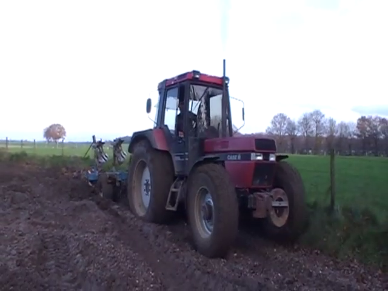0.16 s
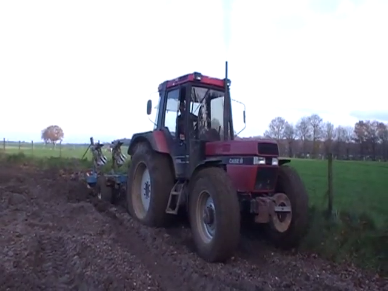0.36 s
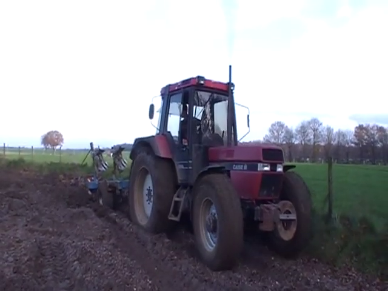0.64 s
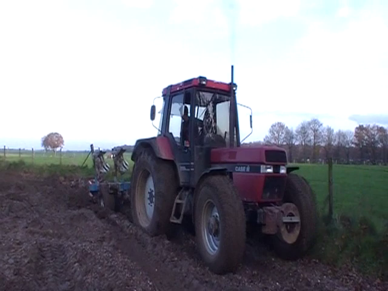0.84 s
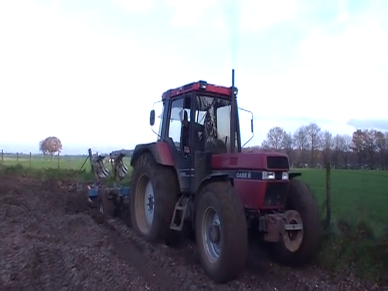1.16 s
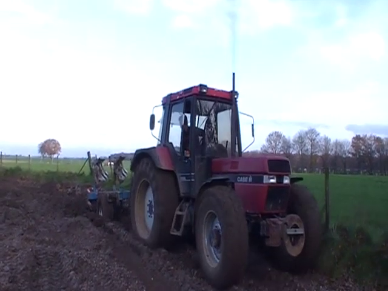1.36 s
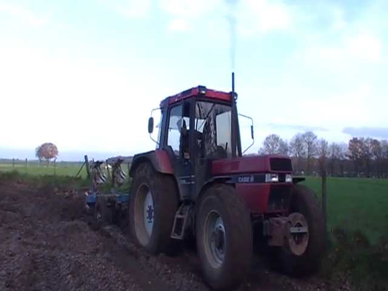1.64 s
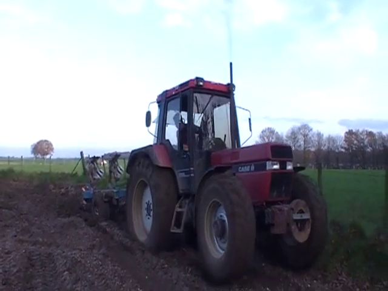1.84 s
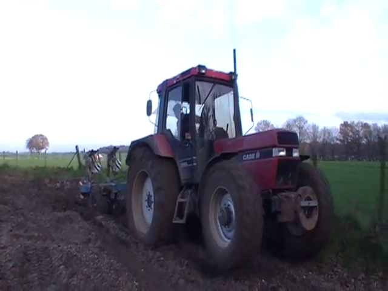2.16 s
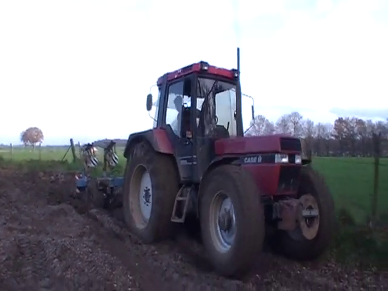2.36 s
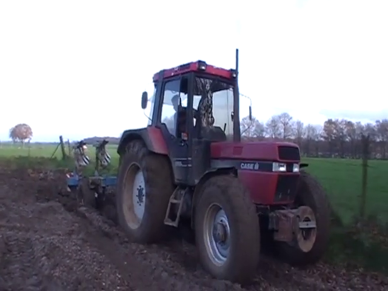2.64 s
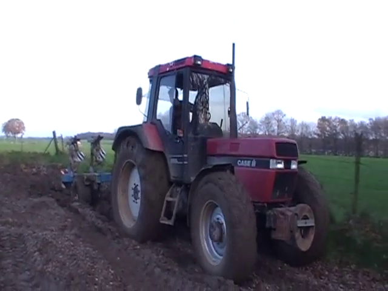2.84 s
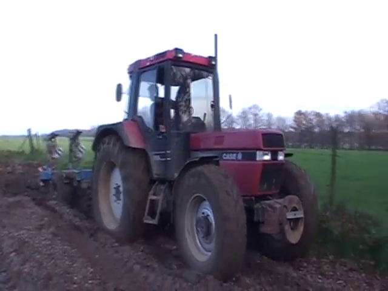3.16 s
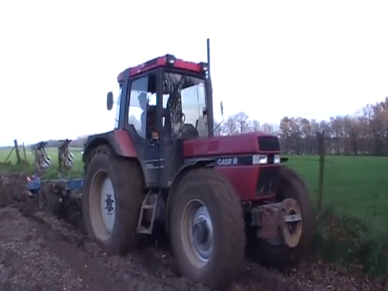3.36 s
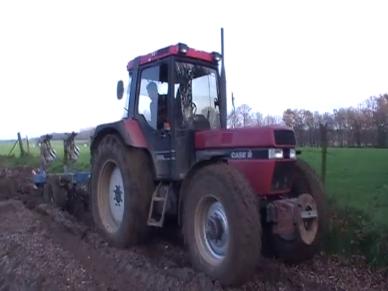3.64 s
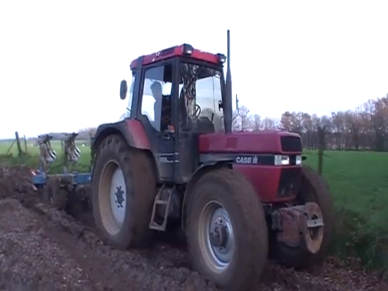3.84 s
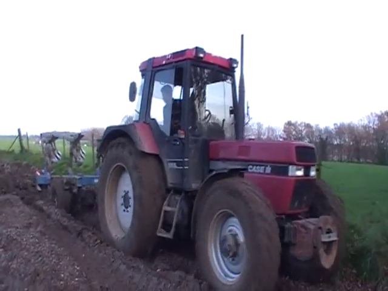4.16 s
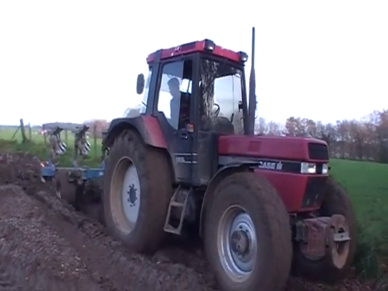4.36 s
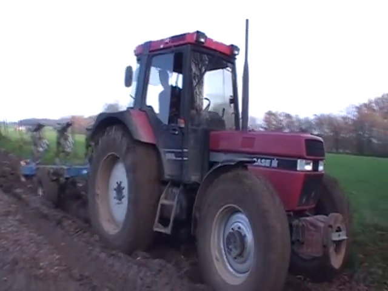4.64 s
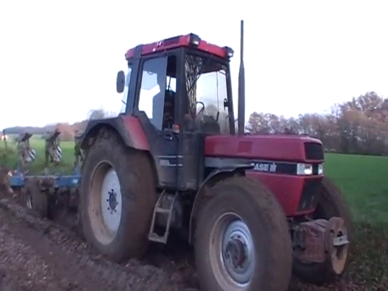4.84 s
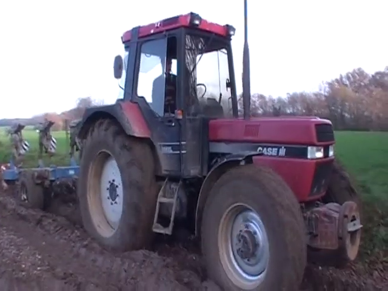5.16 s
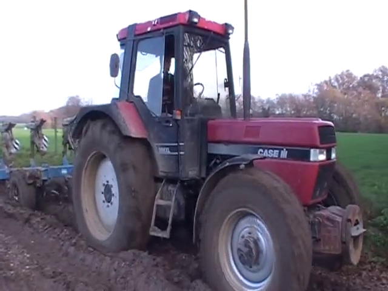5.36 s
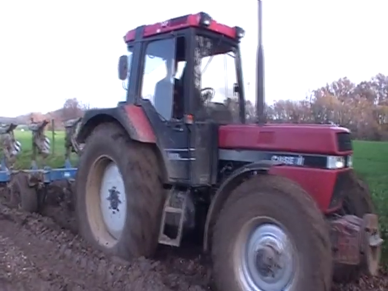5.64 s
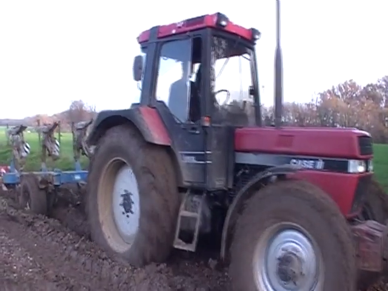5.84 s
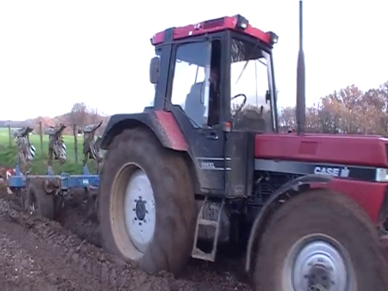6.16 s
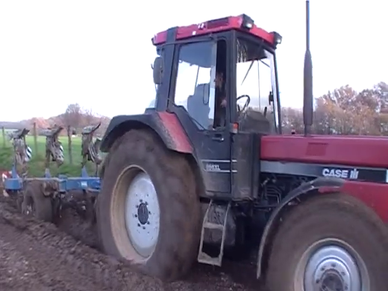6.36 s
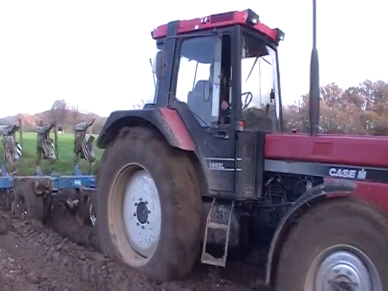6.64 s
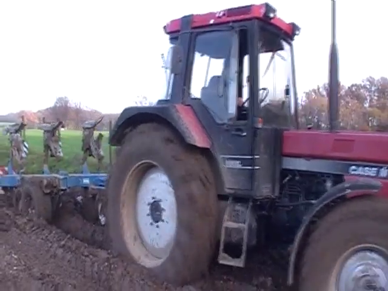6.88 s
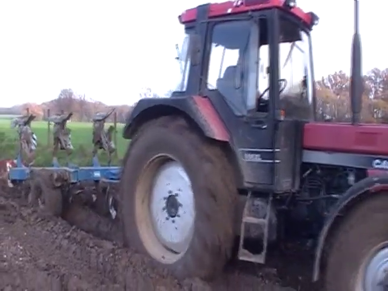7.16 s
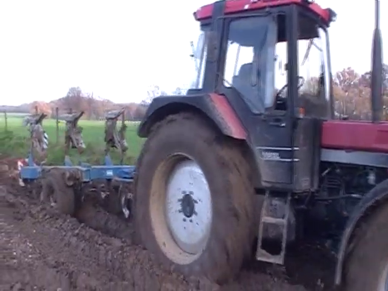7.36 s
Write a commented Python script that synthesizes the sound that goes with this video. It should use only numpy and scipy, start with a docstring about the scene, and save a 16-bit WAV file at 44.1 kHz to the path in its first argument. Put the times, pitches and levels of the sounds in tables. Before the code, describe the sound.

A loaded diesel engine rattles continuously, close and dry, with no room echo. Sharp, squeaky metal chirps and fan hiss sit above a gritty midrange roar. The engine speed sags, picks up after two seconds, then holds. The tractor comes nearer to a microphone at the field edge; drones and gear whines strengthen, with scattered dull clanks, soft low bumps and a thin high squeal late on.

```python
"""A six-cylinder diesel tractor draws closer across an open field, dragging a plough through wet soil.
Each firing modulates the block's resonant rattle, and harmonics of the engine cycle form hum, drones and whines.
Gated narrow-band noise and frequency-modulated bursts make metallic chirps; one chirp tone rings on as a squeal.
Coloured noise makes the hiss of fan, intake and soil, and a brief spurt of it.
Damped bursts make the ironwork knock; low pulses and filtered noise make faint bumps and rumble."""
import sys
import numpy as np
from scipy import signal
from scipy.fft import rfft, irfft
from scipy.io import wavfile
from scipy.ndimage import uniform_filter1d

SR = 44100
rng = np.random.default_rng(int(sys.argv[2]) if len(sys.argv) > 2 else 0)


def dump(signal):
    """Clip the signal to [-1, 1] and save it as 16-bit WAV at the path in sys.argv[1]."""
    limited = np.clip(np.atleast_2d(signal).T, -1, 1)
    pcm = np.round(limited * 32767).astype(np.int16)
    wavfile.write(sys.argv[1], SR, pcm)


N = 331191
T = np.arange(N) / SR  # time [s]
HZ = np.fft.rfftfreq(N, 1 / SR)  # frequency [Hz]

# Levels in the tables are relative: each source applies its own gain.
# faint rumble beneath the bumps: (frequency [Hz], level [dB per Hz])
RUMBLE_COLOUR = [(8, -4), (25, -4), (60, 2), (120, -9), (400, -50), (1000, -90)]
# soft low bumps: (time [s], peak [dB])
BUMPS = [(0.264, -48), (0.47, -63), (1.137, -62), (1.311, -60), (1.755, -59), (1.839, -61), (2.209, -58),
         (2.35, -64), (2.797, -58), (2.943, -56), (3.462, -62), (4.46, -60), (5.811, -57), (6.087, -60),
         (6.189, -57), (6.791, -57)]
# weaker bumps by chance: mean rate [1/s] and relative peak [dB]
WEAK_BUMPS_PER_S, WEAK_BUMP_DB = 3, -67
# brief spurt of hiss: (time [s], length [s], level [dB])
SPURT = (1.915, 0.067, -19)
# colour of the spurt: (frequency [Hz], level [dB per Hz])
SPURT_COLOUR = [(2000, -30), (4000, -6), (5200, -4.5), (8500, 4), (12000, 3), (16000, -7)]
# knocks of the ironwork under load: (time [s], decay [s], thud [dB], clank [dB])
JOLTS = [(1.188, 0.004, -34, -19), (1.296, 0.004, -17, -34), (2.213, 0.005, -28, -24),
         (2.926, 0.0046, -16, -30), (3.098, 0.004, -32, -19), (4.1325, 0.003, -21, -11),
         (5.412, 0.004, -18, -26), (5.683, 0.004, -16, -32), (6.178, 0.008, -17, -16),
         (6.334, 0.003, -19, -16), (7.206, 0.005, -17, -28), (7.262, 0.005, -15, -12),
         (7.267, 0.006, -26, -13), (7.314, 0.005, -19, -30), (7.399, 0.004, -17, -32)]
# resonances of a knock, first the thud, then the clank: (frequency [Hz], width [Hz], level [dB])
IRON_MODES = [(781, 420, 1), (1960, 500, -4), (2780, 410, -3), (3330, 460, -9)]
# hiss of fan, intake and soil, from afar and close by: (frequency [Hz], level [dB per Hz])
HISS_FAR = [(2500, -18.5), (4600, -9.5), (5400, -2), (6800, 0.5), (8000, -0.5), (10000, 4.5), (12000, -1),
            (13200, -6), (14500, -7), (16000, -19.5)]
HISS_NEAR = [(2500, -32), (4600, -3), (5400, -5), (6500, 1), (8000, 1.5), (10000, 5), (11600, 1.5),
             (13000, -3), (14000, -4), (16000, -7)]
# balance as the view turns from nose to flank: (time [s], hiss [dB], chirps [dB])
BALANCE = [(0.0, -9.5, 4), (2.0, -10.5, 4.5), (2.8, -11, 1), (3.7, -9.5, 0), (5.05, -10, -4.5),
           (5.7, -9, 1), (6.3, -9, -2.5), (7.5, -9, -4.5)]
# narrow squeal of the chirping metal as the flank passes: (time [s], pitch [Hz], level [dB])
SQUEAL = [(5.3, 9400, -60), (5.55, 9400, -32), (5.76, 9600, -28), (5.88, 9430, -39), (6.05, 9350, -29),
          (6.25, 9250, -40), (6.55, 9140, -31), (6.85, 9300, -42), (7.5, 9350, -35)]
# hardest single chirps: (time [s], peak [dB], pitch [Hz])
HARD_CHIRPS = [(0.169, -10, 9960), (0.2724, 0, 10400), (0.3232, -1, 9310), (0.606, -8, 9680),
               (1.043, -13, 9610), (1.2573, -4, 10000), (1.3059, -9, 10100), (1.3947, -7, 10100),
               (1.8403, 0, 10130), (1.991, -4, 9500), (2.9437, -1, 10200), (3.109, -5, 9980),
               (3.3283, -2, 10100), (3.457, -2, 9400), (5.484, -7, 9550), (5.694, 0, 10100),
               (5.8097, -7, 9800), (5.9728, -5, 9670), (6.1888, -0.5, 9200), (6.5151, 0, 9300),
               (6.8957, -5, 9800), (7.1117, -4, 8850)]
# the chirps shift from far to near pitch as the tractor draws level: (start [s], end [s])
CHIRP_TURN_S = [3.7, 6.2]
# bright tick at the start of each chirp: (frequency [Hz], level [dB per Hz])
TICK_COLOUR = [(4000, -40), (7000, -21), (8400, -3), (9300, 0.5), (10300, 1.5), (11000, -5.5), (11700, -1),
               (12600, -8), (14000, -16), (16000, -24)]
# strokes in firing order: (knock [dB], thud [dB], chirp [dB], far pitch [Hz], near pitch [Hz],
# bright edge [dB], rebound [0-1])
CYLINDERS = [(-3, -2, -5, 10100, 9900, 0.5, 0.44), (-3, -4, 0, 9350, 9250, -6, 0.65),
             (-3, -4, -6.5, 9800, 9400, 0.5, 0.4), (-3.5, 0, -5.5, 9900, 11000, -10.5, 0.15),
             (0, -7, -6, 10250, 10000, 2.5, 1), (-1, -8, -1, 10050, 9600, 0, 0.55)]
# gear and fan whines: (multiple of the cycle, wobble [turns], its curve of (time [s], level [dB]))
WHINES = [(21.97, 0.059, [(0, -50), (2.5, -54), (4.5, -43), (5.1, -37), (5.7, -37), (6.1, -40),
          (7.0, -41.5), (7.5, -42)]), (28.1, 0.05, [(0, -60), (2.2, -44), (2.7, -44), (4.0, -41),
          (4.5, -41), (4.8, -39.5), (5.8, -47), (7.3, -41), (7.5, -32)]), (43.42, 0.04, [(0.1, -34.5),
          (0.45, -48), (0.75, -38), (1.05, -43), (1.4, -35.5), (2.0, -50), (3.4, -44), (4.3, -36),
          (5.3, -42), (5.9, -38), (6.3, -32.5), (7.0, -33), (7.5, -37)]), (60, 0.15, [(0, -46), (0.7, -39),
          (1.6, -39.5), (2.0, -43), (2.8, -35), (3.6, -37), (4.05, -39), (4.35, -33.5), (4.8, -46),
          (6.4, -42), (6.8, -34), (7.5, -40)]), (66, 0.08, [(0, -54), (1.2, -43), (2.5, -47), (3.4, -43),
          (4.1, -52), (4.4, -41), (4.8, -30), (5.5, -44), (6.15, -30.5), (6.35, -47), (7.5, -43)]),
          (143.5, 0.13, [(0, -60), (3.5, -52), (4.1, -32), (4.4, -41), (5.35, -40), (5.62, -27.5),
          (5.95, -39), (6.55, -35.5), (6.95, -30.5), (7.5, -35)]), (215, 0.18, [(0, -46), (3.7, -59),
          (4.2, -43), (4.45, -52), (5.25, -35.5), (5.7, -50), (6.05, -39.5), (6.4, -56), (6.9, -38),
          (7.5, -46)])]
# steady engine drones: (multiple of the cycle, its curve of (time [s], level [dB]))
DRONES = [(34, [(0, -48), (1.9, -46), (2.8, -41), (3.7, -44), (4.3, -49), (5.5, -40), (6.1, -50),
          (7.0, -44), (7.5, -45)]), (37, [(0, -48), (3.0, -44), (3.8, -52), (4.4, -37), (5.0, -36),
          (5.5, -39), (6.1, -32.5), (6.6, -43), (7.0, -39), (7.5, -45)]), (38, [(0, -63), (2.2, -52),
          (2.9, -43), (3.9, -54), (4.9, -52), (5.5, -37), (6.2, -44), (7.5, -42)]), (39.65, [(0, -54),
          (0.45, -49), (0.75, -38), (1.2, -52), (1.6, -36), (2.0, -46), (3.4, -49), (4.3, -44), (5.2, -43),
          (5.8, -52), (7.5, -52)]), (40, [(0, -60), (2.2, -54), (2.8, -48), (3.4, -47), (4.1, -38.5),
          (4.7, -39), (5.3, -42), (5.6, -53), (7.5, -54)]), (41, [(0, -46), (0.75, -41), (1.1, -45),
          (2.2, -41), (3.7, -45), (4.05, -56), (5.2, -41), (5.8, -41), (6.4, -34), (7.1, -31.5),
          (7.5, -41)]), (42, [(0, -54), (2.9, -47), (3.4, -56), (4.5, -42), (5.2, -34), (5.8, -41),
          (6.15, -37), (7.5, -39)])]
# engine hum: multiples of the two-turn cycle [1], one for each row of HUM_LEVELS
HUM_MULTIPLES = [5.25, 6, 9, 12, 14, 18, 21, 24, 30, 33, 35, 36]
# levels of those multiples: (far [dB], midway [dB], near [dB])
HUM_LEVELS = [(-86, -71, -70), (-63.5, -62.5, -62.5), (-71, -60.5, -76), (-62, -60, -53.5),
              (-55, -68, -54.5), (-47, -45, -49), (-62, -54, -46), (-51, -44, -48.5), (-42, -49, -58),
              (-48, -44, -46), (-54, -49, -43), (-57, -42.5, -42.5)]
# when the tractor is far, midway and near: (time [s])
HUM_TIMES = [0.72, 4.6, 5.6]
# clatter of the block, from afar and close by: (frequency [Hz], level [dB per Hz])
CLATTER_FAR = [(53, -53), (90, -29), (110, -32), (128, -46), (147, -25.5), (235, -17.5), (264, -17),
               (297, -11.5), (382, -10), (676, -1), (996, -0.5), (1070, -6), (1260, -0.5), (2780, -8),
               (5000, -15.5), (6500, -36), (11000, -120)]
CLATTER_NEAR = [(53, -66), (90, -32.5), (216, -17.5), (287, -14.5), (323, -11), (402, -7.5), (475, -11.5),
                (517, -1.5), (612, -2), (774, -2), (947, -2), (1200, -0.5), (1540, -1), (2730, -6),
                (5000, -14), (6500, -19.5), (11000, -120)]
# peaks and dips in the clatter's tone: (frequency [Hz], width [Hz], gain [dB])
PEAKS_AND_DIPS = [(717, 170, 0), (980, 290, -2), (1140, 150, 1.5), (1567, 350, -3.5), (1860, 260, 1.5),
                  (3370, 770, 2.5), (4700, 480, -8)]
# upper edges of growl, thuds and clatter: (frequency [Hz])
REGION_EDGES = [720, 1250, 9000]
# crankshaft speed, sagging under load and picking up: (time [s], speed [rpm])
CRANK_SPEED = [(0.0, 1948.6), (0.26, 1956.6), (1.24, 2056.6), (1.94, 1987.4), (2.13, 1984.3),
               (2.54, 2170.6), (2.77, 2139.8), (2.97, 2189.0), (3.53, 2169.2), (3.8, 2250.3),
               (4.46, 2215.4), (4.8, 2257.1), (5.28, 2238.4), (5.65, 2196.8), (6.1, 2224.4), (6.49, 2192.4),
               (7.09, 2232.5), (7.51, 2208.2)]
# loudness of the whole sound, rising overall with brief dips: (time [s], level [dB])
LOUDNESS = [(0.03, -21.5), (0.14, -26.0), (0.21, -23.5), (0.35, -25), (0.8, -23.5), (1.06, -24.5),
            (1.2, -24.0), (1.65, -23.0), (1.9, -26), (2.21, -22.5), (2.3, -21), (2.38, -23.0),
            (2.44, -25.5), (2.6, -22.0), (2.93, -19.5), (2.97, -24.5), (3.08, -21.0), (3.21, -21.0),
            (3.37, -25.0), (3.53, -22.5), (3.59, -20.5), (3.63, -24), (3.69, -22), (3.9, -20.5),
            (4.35, -20.0), (4.48, -21.5), (4.6, -19.5), (4.66, -21.5), (4.8, -19.0), (4.93, -21.0),
            (5.02, -19.0), (5.14, -19), (5.27, -19.0), (5.35, -21.5), (5.47, -20.5), (5.68, -22.5),
            (5.72, -25), (5.84, -23.0), (6.03, -20.5), (6.18, -22), (6.22, -24), (6.42, -19.0),
            (6.56, -22.5), (6.88, -19), (6.99, -21.0), (7.1, -19.0), (7.16, -20.5), (7.5, -20)]
# random flutter of the loudness: depth [dB rms] and highest rate [Hz]
FLUTTER_DB, FLUTTER_HZ = 0.66, 18
# share of the quick swells and dips of the level that the chirps follow [0-1]
CHIRP_FOLLOWS = 0.24
EDGE_HZ = 15750  # final low-pass edge [Hz]


def amp(db):
    """Logarithmic level: converts decibels to amplitude gain."""
    return 10 ** (np.asarray(db) / 20)


def unit(x):
    """Power normalization: scales a signal to rms 1."""
    return x / np.sqrt(np.mean(x ** 2) + 1e-20)


def curve(rows, axis=1):
    """Linear interpolation: reads one table column at every sample."""
    rows = np.asarray(rows)
    return np.interp(T, rows[:, 0], rows[:, axis])


def colour(x, points):
    """Spectral shaping: weights a spectrum by (frequency [Hz], level [dB]) points, then normalizes it."""
    hz, db = np.transpose(points)
    gain = amp(np.interp(np.log(HZ + 1), np.log(hz), db))
    return unit(irfft(rfft(x) * gain, N))


def band(x, lo_hz, hi_hz):
    """Band-pass filtering: keeps the spectrum between two soft edges."""
    low_pass = 1 / (1 + (HZ / hi_hz) ** 10)
    high_pass = 1 - 1 / (1 + (HZ / lo_hz) ** 10)
    return irfft(rfft(x) * low_pass * high_pass, N)


def noise():
    """White noise: independent Gaussian samples."""
    return rng.standard_normal(N)


def drift(rate_hz):
    """Random modulation: sums 16 slow sines of random rate and phase, scaled to rms 1."""
    grid = np.linspace(0, T[-1], num=1000)
    hz = rate_hz * rng.uniform(.2, 1, (16, 1))
    waves = np.sin(2 * np.pi * (hz * grid + rng.random(hz.shape)))
    return np.interp(T, grid, unit(waves.sum(0)))


def swell(s, length, db):
    """Amplitude envelope: a short rounded swell of level."""
    return amp(db) * np.exp(-np.minimum(abs(2 * (T - s) / length), 5) ** 4)


def warble(hz, width_hz):
    """Narrow-band noise: a complex random envelope, its peaks rounded off, shifts to a pitch curve."""
    fuzz = unit(band(noise(), 0.85, width_hz / 2)) + 1j * unit(band(noise(), 1, width_hz / 2))
    rounded = fuzz / np.sqrt(1 + abs(fuzz) ** 2)
    carrier = np.exp(2j * np.pi * np.cumsum(hz * np.ones(N)) / SR)
    return unit((rounded * carrier).real)


def tone(turns, db, waver_db, wobble, waver_hz=5, wobble_hz=15):
    """Amplitude and phase modulation: a sine fades and wobbles independently."""
    level = amp(db + waver_db * drift(waver_hz))
    phase = turns + rng.random() + wobble * drift(wobble_hz)
    return np.sqrt(2) * level * np.sin(2 * np.pi * phase)


def view_colour(x, far, near):
    """Changing spectral balance: blends two colours as the tractor comes closer."""
    share = np.interp(T, [1.8, 4.1], [0, 1])
    return (1 - share) * colour(x, far) + share * colour(x, near)


def strokes(cycle, peak_at):
    """Cyclic phase: gives the nearest stroke's count, its cylinder, and the offset in strokes."""
    place = cycle * len(CYLINDERS) - peak_at
    count = np.round(place).astype(int)
    return count + 1, count % len(CYLINDERS), place - count


def scatter(count, spread_db):
    """Cycle-to-cycle variation: a bounded random gain for each stroke."""
    return amp(spread_db * np.clip(rng.standard_normal(count.max() + 1), -2, 2))[count]


def bumps(level_db=3, length=0.0045, floor_db=-83):
    """Low pulses: soft Gaussian bumps, listed and random, over low-frequency filtered noise."""
    weak = [(s, WEAK_BUMP_DB) for s in np.cumsum(rng.exponential(1 / WEAK_BUMPS_PER_S, size=40))]
    pulses = sum(amp(db + level_db) * np.exp(-np.minimum(abs(T - s) / length, 10) ** 2)
                 for s, db in BUMPS + weak if s < T[-1])
    return pulses + amp(floor_db) * colour(noise(), RUMBLE_COLOUR)


def spurt():
    """Transient noise: one rounded swell of bright hiss."""
    return swell(*SPURT) * colour(noise(), SPURT_COLOUR)


def jolts(level_db=-2.0, attack=0.0015):
    """Damped impact: plough and linkage knock with a dull thud and a short clank."""
    s, decay, thud_db, clank_db = np.transpose(JOLTS)
    last = np.maximum(np.searchsorted(s, T) - 1, 0)
    age = np.maximum(T - s[last], 0)
    damping = np.exp(-np.clip((age - attack) / decay[last], 0, 20))
    blow = np.minimum(age / attack, 1) * damping
    thud, *clank = [amp(db) * warble(hz, width) for hz, width, db in IRON_MODES]
    return amp(level_db) * blow * (amp(thud_db)[last] * thud + amp(clank_db)[last] * sum(clank))


def hiss(cycle, level_db=6.5, throb=0.58, spread_db=3):
    """Amplitude-modulated turbulence: broad noise puffs unevenly with the firing."""
    count, _, offset = strokes(cycle, 0.85)
    pulse = scatter(count, spread_db) * (1 + np.cos(2 * np.pi * offset))
    puffs = noise() * (3 + throb * pulse)
    return amp(level_db + curve(BALANCE)) * view_colour(puffs, HISS_FAR, HISS_NEAR)


def squeal(cycle, level_db=0.0, width_hz=420, throb=0.77):
    """Modulated narrow-band ringing: a thin, rough tone swells once in each engine cycle."""
    surge = unit(1 + throb * np.cos(2 * np.pi * (cycle - 0.33)))
    return amp(level_db + curve(SQUEAL, axis=2)) * surge * warble(curve(SQUEAL), width_hz)


def hard_chirps(level_db=-7.0, rise=0.001, length=0.0013):
    """Frequency-modulated pulse: single chirps stand out in short Gaussian bursts."""
    s, db, hz = np.transpose(HARD_CHIRPS)
    nearest = np.searchsorted((s[1:] + s[:-1]) / 2, T)
    burst = amp(db[nearest] + level_db) * np.exp(-((T - s[nearest] - rise) / length) ** 2)
    pitch = hz[nearest] + 200 * unit(band(noise(), 0.94, 420))
    return burst * np.sin(2 * np.pi * np.cumsum(pitch) / SR)


def squeak(cycle, width=0.18, spread_db=3.0, near_rebound=0.51, rebound_after=0.43, rub=0.14):
    """Repeated excitation: narrow-band chirps at each stroke rebound once over a constant rub."""
    _, _, chirp_db, far_hz, near_hz, _, rebound = np.transpose(CYLINDERS)
    near = np.interp(T, CHIRP_TURN_S, [0, 1])
    count, cylinder, offset = strokes(cycle, 0.67)
    burst = np.exp(-(offset / width) ** 2) * amp(chirp_db)[cylinder] * scatter(count, spread_db)
    pitch = (1 - near) * far_hz[cylinder] + near * near_hz[cylinder]
    first = burst * warble(pitch * (1 + 0.018 * noise()[count]), width_hz=600)
    # the rebound delay is a fraction of a stroke
    later = np.interp(cycle - rebound_after / len(CYLINDERS), cycle, burst * rebound[cylinder])
    later *= 1 - near + near * near_rebound
    rebound_hz = (9950 - 550 * near) * (1 + 0.0243 * drift(40))
    return first + (later + rub) * warble(rebound_hz, width_hz=1700)


def tick(cycle, width=0.17, spread_db=2.2):
    """Broadband onset: coloured noise sharpens each stroke, spreading wider and higher than the squeak."""
    bright_db = np.transpose(CYLINDERS)[5]
    count, cylinder, offset = strokes(cycle, 0.68)
    burst = np.exp(-(offset / width) ** 2) * amp(bright_db)[cylinder] * scatter(count, spread_db)
    return burst * colour(noise(), TICK_COLOUR)


def chirps(cycle, level_db=-2.0, edge_db=-7.5, near_edge_db=2.5):
    """Superposition: metallic squeaks and ticks add, the ticks standing out more from close by."""
    tick_db = edge_db + near_edge_db * np.interp(T, [2.4, 4.2], [0, 1])
    metal = amp(level_db) * unit(squeak(cycle)) + amp(tick_db) * unit(tick(cycle))
    return amp(curve(BALANCE, axis=2)) * metal


def tones(cycle, swell_db, hum_db=-1.0, drone_db=-1.0, whine_db=0.0, follows=0.8):
    """Harmonic synthesis: hum, drones and whines follow multiples of the cycle and share the level's swells."""
    hum = sum(tone(k * cycle, np.interp(T, HUM_TIMES, db), waver_db=1.0, wobble=0.0018 * k)
              for k, db in zip(HUM_MULTIPLES, HUM_LEVELS))
    drone = sum(tone(k * cycle, curve(level), waver_db=0.8, wobble=0.025) for k, level in DRONES)
    whine = sum(tone(k * cycle, curve(level), waver_db=1.5, wobble=wobble)
                for k, wobble, level in WHINES)
    mix = amp(hum_db) * hum + amp(drone_db) * drone + amp(whine_db) * whine
    return mix * amp(follows * swell_db)


def rattle(cycle, repeat=0.52, change_hz=0.8006, clacks_per_s=900, clack_db=-2.0, spread_db=2.0):
    """Partly periodic excitation: a slowly changing cyclic pattern joins noise and random clacks."""
    grid = np.linspace(0, 1, num=1200)  # phase within the cycle
    blend = np.array([drift(change_hz) for _ in range(5)])
    weights = blend / np.linalg.norm(blend, axis=0)
    pattern = sum(w * np.interp(cycle % 1, grid, rng.standard_normal(len(grid))) for w in weights)
    sizes = amp(spread_db * np.minimum(rng.exponential(1, N), 4))
    clacks = (rng.random(N) < clacks_per_s / SR) * np.sign(noise()) * sizes
    chance = unit(noise() + amp(clack_db) * unit(clacks))
    share = np.clip(repeat, 0, 1)
    return np.sqrt(share) * unit(pattern) / 2 + np.sqrt(1 - share) * chance


def peaks_and_dips(x, wander_db=1.0, wander_hz=2.21):
    """Parallel filtering: narrow bands are added or subtracted, and each peak or dip drifts at random."""
    change = 0
    for hz, width, db in PEAKS_AND_DIPS:
        gain = amp(db + wander_db * drift(wander_hz)) - 1
        change = change + gain * signal.lfilter(*signal.iirpeak(hz, hz / width, SR), x)
    return x + change


def knocks(cycle, weight_db, peak_at=0.69, width=0.53, spread_db=2.5, flutter_db=0.52):
    """Periodic excitation: an uneven blow at each firing, with a random flutter of level."""
    count, cylinder, offset = strokes(cycle, peak_at)
    blow = np.exp(-(offset / width) ** 2) * amp(weight_db)[cylinder] * scatter(count, spread_db)
    return unit((1 + blow) * amp(flutter_db * drift(16)))


def block(cycle, growl_db=-11.0, clatter_db=-0.1):
    """Source and filter: the block colours the rattle; firing modulates its thuds and clatter."""
    knock_db, thud_db = np.transpose(CYLINDERS)[:2]
    body = view_colour(peaks_and_dips(rattle(cycle)), CLATTER_FAR, CLATTER_NEAR)
    below = [band(body, 20, hz) for hz in REGION_EDGES]
    growl = below[0]
    thuds, clatter = np.diff(below, axis=0)
    knocking = thuds * knocks(cycle, thud_db) + clatter * knocks(cycle, knock_db)
    return amp(growl_db) * unit(growl) + amp(clatter_db) * unit(knocking)


def scene(engine_db=-0.74):
    """Synchronous superposition: engine parts share one four-stroke cycle, two crank turns long."""
    cycle = np.cumsum(curve(CRANK_SPEED)) / SR / 120  # rpm to accumulated two-turn cycles
    loudness = curve(LOUDNESS) + FLUTTER_DB * drift(FLUTTER_HZ)
    approach_db = uniform_filter1d(loudness, SR)  # one-second mean
    swell_db = loudness - approach_db
    roar = amp(swell_db) * (block(cycle) + hiss(cycle))
    roar += amp(CHIRP_FOLLOWS * swell_db) * chirps(cycle)
    engine = amp(engine_db + approach_db) * roar
    engine += tones(cycle, swell_db) + hard_chirps() + squeal(cycle)
    return (band(engine + jolts(), 70, 20000) + spurt() + bumps())[None]


def record(dry):
    """Band limitation: a symmetric FIR low-pass removes the highest treble."""
    low_pass = signal.firwin(511, EDGE_HZ, window=("kaiser", 9), fs=SR)
    return signal.oaconvolve(dry, low_pass[None], "same")


dry = scene()
out = record(dry)
dump(out)
```